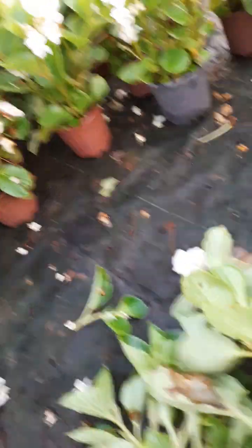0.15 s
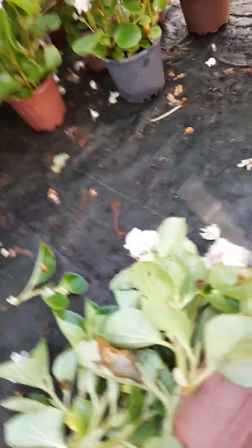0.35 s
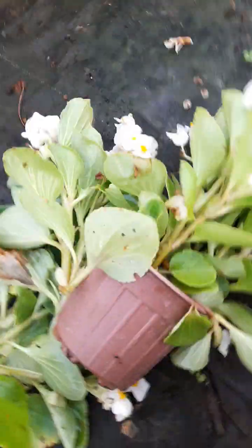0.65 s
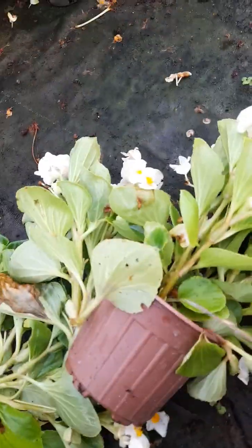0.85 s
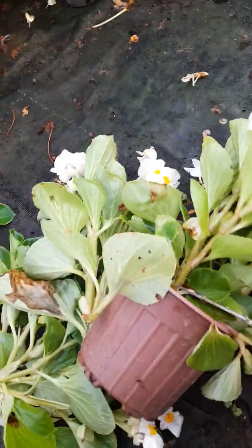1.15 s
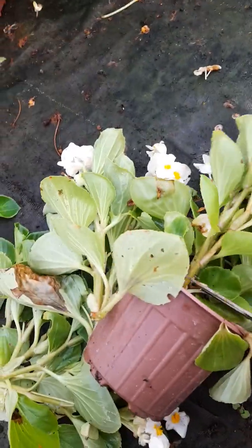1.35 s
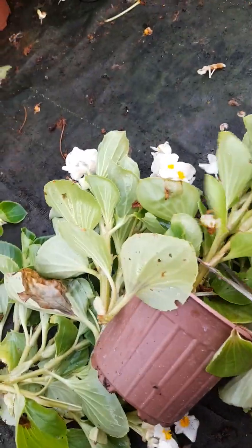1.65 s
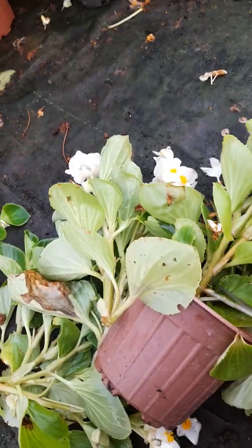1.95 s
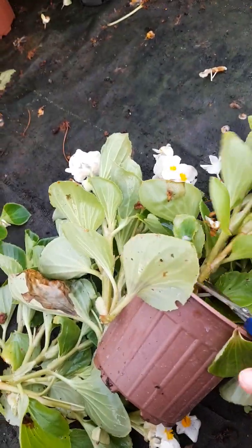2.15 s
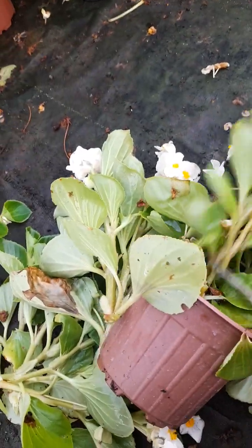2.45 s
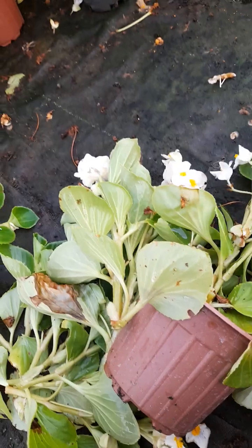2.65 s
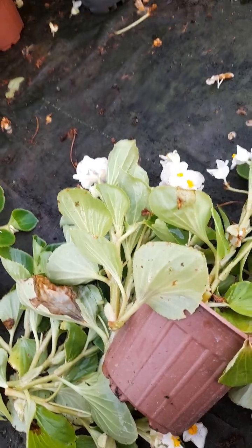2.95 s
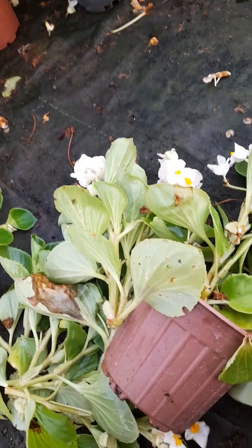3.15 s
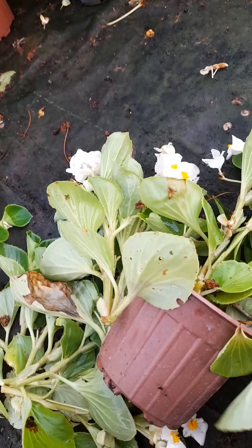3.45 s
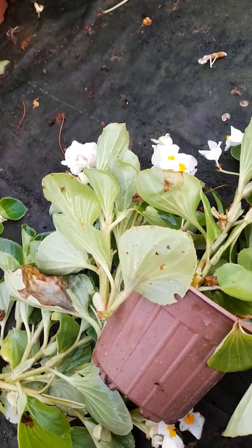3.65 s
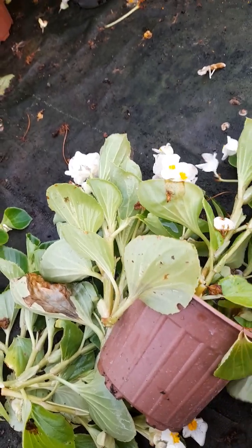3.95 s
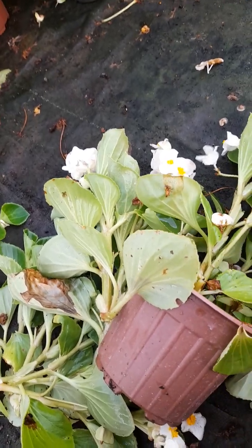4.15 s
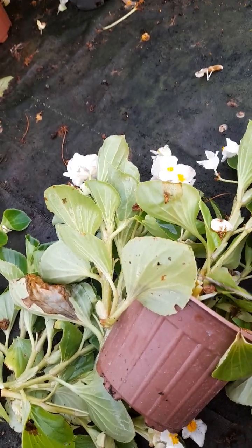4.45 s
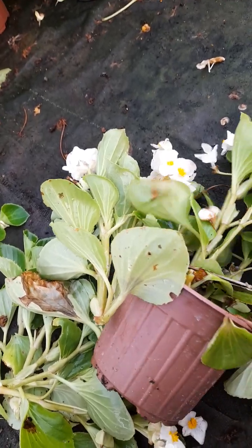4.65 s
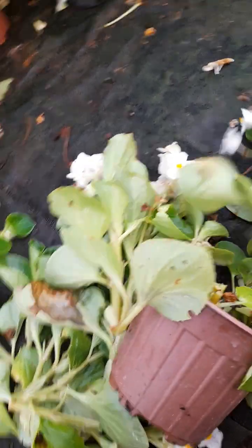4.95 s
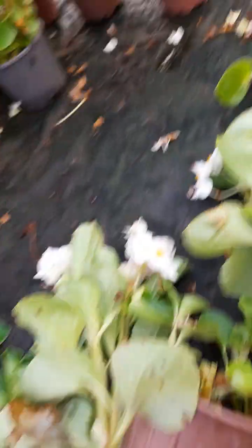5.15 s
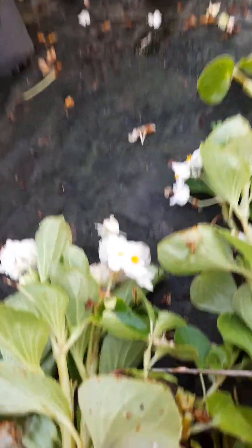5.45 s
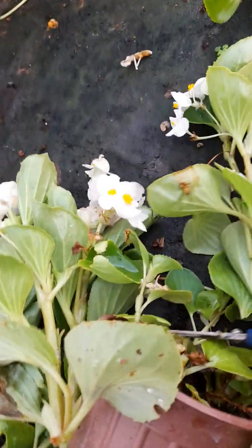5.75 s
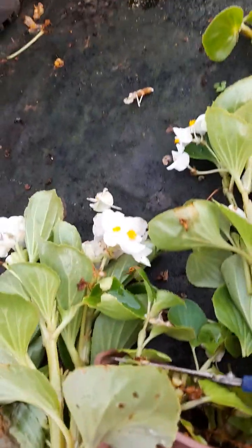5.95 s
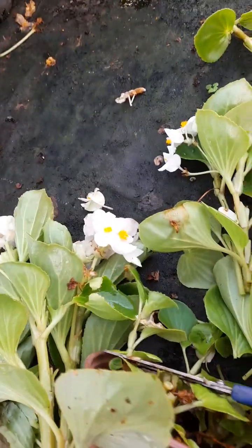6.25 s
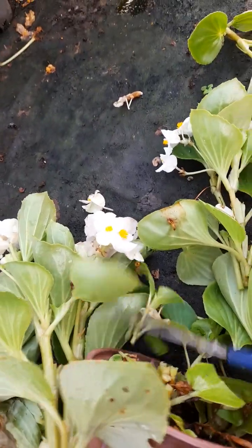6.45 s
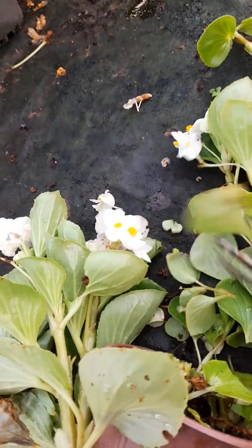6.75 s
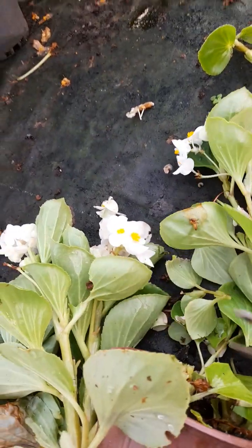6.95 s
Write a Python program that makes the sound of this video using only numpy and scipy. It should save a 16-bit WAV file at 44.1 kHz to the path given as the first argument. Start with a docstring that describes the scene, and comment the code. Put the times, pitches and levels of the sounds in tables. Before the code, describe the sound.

Leaves rustle and crack close by as snips sharply cut through stems four times, with distant fans rumbling faintly.

```python
"""Snipping stems in a greenhouse

Hand snips cut the fleshy stems of potted plants close to a hand-held phone. Each cut snaps sharply,
jolts the hand and flutters between ground and roof. Leaves rustle by friction and crack as they give way.
A low rumble of distant fans and a faint hiss lie underneath."""
import sys
import numpy as np
from scipy import signal
from scipy.fft import rfft, irfft, next_fast_len
from scipy.io import wavfile
from scipy.ndimage import uniform_filter1d, map_coordinates

SR = 44100
rng = np.random.default_rng(int(sys.argv[2]) if len(sys.argv) > 2 else 0)


def pcm_store(signal):
    """Save signal as 16-bit PCM."""
    levels = np.round(np.clip(np.atleast_2d(signal), -1, 1) * 32767)
    wavfile.write(sys.argv[1], SR, levels.astype(np.int16).T)


N = 313551


def amp(db):
    """Amplitude ratio of a level in dB."""
    return 10 ** (np.asarray(db) / 20)


def unit(x):
    """Normalisation to rms 1."""
    return x / np.sqrt(np.mean(x ** 2) + 1e-20)


def along(points, hz):
    """Interpolation on a logarithmic frequency axis."""
    f, v = np.transpose(points)
    return np.interp(np.log(hz + 1), np.log(f + 1), v)


def wobble(rate):
    """Smooth random modulation, rate knots a second."""
    knots = rng.standard_normal(int(N * rate / SR) + 4)
    return map_coordinates(knots, [np.arange(N) * rate / SR])


def filtered(x, response):
    """Linear filtering by a complex frequency response."""
    m = next_fast_len(x.shape[-1] + 8192)
    return irfft(rfft(x, m) * response(np.fft.rfftfreq(m, 1 / SR)), m)[..., :x.shape[-1]]


def coloured(x, spectrum):
    """Spectral shaping, at rms 1."""
    return unit(filtered(x, lambda hz: amp(along(spectrum, hz))))


def stereo_noise(correlation):
    """Partly coherent white noise, mixed from mid and side."""
    turn = np.arccos(correlation) / 2
    mid, side = rng.standard_normal((2, N)) * [[np.cos(turn)], [np.sin(turn)]]
    return np.array([mid + side, mid - side])


def panned(db):
    """Two gains for a pan, the level of left over right."""
    return amp(np.multiply.outer([.5, -.5], db))


# Each row: time in seconds, rumble level in dB.
FAN_LEVELS = [(0.0, -48), (0.16, -51.5), (0.73, -54.5), (1.05, -49.5), (1.58, -62.5), (2.59, -53.5),
              (2.71, -55.5), (2.91, -58), (3.15, -62), (3.46, -56), (3.9, -52), (4.36, -56), (4.83, -57),
              (5.17, -55.5), (5.96, -56), (6.3, -60.5), (6.65, -55.5), (7.11, -56.5)]
# Each row: frequency in Hz, relative spectral density in dB.
FAN_SPECTRUM = [(13, -62.5), (22, -35), (42, -8), (64, 2), (102, -5), (199, -20.5), (269, -21.5),
                (381, -28), (700, -39), (910, -63.5), (1540, -120)]
HISS_SPECTRUM = [(240, -38), (400, -11), (497, -10), (580, -7.5), (1470, -17.5), (2960, -14.5), (3150, -32),
                 (3510, -24), (6230, -16), (8760, -19), (13500, -12.5), (16300, -24)]

def background():
    """Coherence: far fans reach both microphones nearly alike, while the hiss is uncorrelated."""
    fan_db = np.interp(np.arange(N) / SR, *np.transpose(FAN_LEVELS))
    fans = amp(fan_db + 3.3 * wobble(7.5)) * coloured(stereo_noise(0.81), FAN_SPECTRUM)
    hiss = amp(-74 + 0.97 * wobble(15)) * coloured(stereo_noise(0.023), HISS_SPECTRUM)
    return fans + hiss


def contacts(rate, spread_db, life_s):
    """Shot noise: an envelope of tiny contacts that start at once and decay, a few much stronger."""
    starts = (rng.random(N) < rate / SR) * amp(spread_db * rng.exponential(size=N))
    fall = np.exp(-1 / (life_s * SR))
    return unit(signal.lfilter([1], [1, -fall], starts))


def pops(rate, spread_db, cycles):
    """Buckling: leaves pop in damped tones, each with its own pitch and place."""
    when, pitch, strength, place = rng.random((round(rate * N / SR), 4)).T[:, :, None]
    t = np.arange(400) / SR
    hz = 950 * 2.8 ** pitch
    tones = amp(-spread_db * np.log(strength)) * np.sin(2 * np.pi * hz * t) * np.exp(-hz * t / cycles)
    at = ((when * N).astype(int) + np.arange(len(t))).ravel()
    sides = panned(12 * (place - .5))
    return unit(np.array([np.bincount(at, (tones * side).ravel(), N)[:N] for side in sides]))


def patchy(x, depth_db=2.5):
    """Random modulation in patches of time and frequency."""
    z = signal.stft(x, nperseg=256)[2]
    field = uniform_filter1d(rng.standard_normal(z.shape[1:]), size=4, axis=0)
    field = uniform_filter1d(field, size=8, axis=1)
    return signal.istft(z * amp(depth_db * unit(field)), nperseg=256)[1][:, :N]


# Hand and blades brush the leaves. Each row: start and length in seconds, then drag level,
# edge level, swell and pan in dB.
LEAF_STROKES = [(0, 0.064, -42, -48, 0.5, -1.5), (0.078, 0.15, -44.5, -46.5, -7.5, -3),
                (0.205, 0.12, -38.5, -44.5, -5.5, -4), (0.326, 0.11, -48.5, -53.5, -10, -4),
                (0.426, 0.14, -55.5, -57, -4, -3), (0.547, 0.15, -63, -65.5, -12.5, -2),
                (.7, .22, -79, -76.5, 4, -8.5), (0.919, 0.12, -79.5, -74, 15.5, -4),
                (1.044, 0.21, -57.5, -61, -5.5, -2), (1.474, 0.15, -75.5, -70, 9.5, -0.5),
                (1.628, .11, -71.5, -62, -2.5, 0), (1.792, 0.093, -74, -68, 6, -1),
                (1.927, 0.37, -89.5, -86, 17, -4), (2.223, .16, -71.5, -66, 18.5, 0.5),
                (2.386, .17, -49, -45.5, -6, 0), (2.558, 0.14, -52, -59, -5, 0.5),
                (2.697, 0.12, -60, -67.5, -2.5, 0), (2.847, 0.17, -63, -68, 0.5, -0.5),
                (3.037, 0.16, -72, -76, -10, -5), (3.201, 0.1, -70, -73, -6, -5),
                (3.333, 0.16, -71, -69.5, -1.5, -1.5), (3.551, 0.21, -52.5, -51, -0.5, -3.5),
                (3.763, 0.21, -49.5, -50, -7.5, -2.5), (3.864, 0.14, -45, -46.5, -3, 0),
                (4.032, 0.11, -59.5, -63.5, -2.5, -0.5), (4.148, 0.27, -63, -70, -8.5, -2),
                (4.347, 0.27, -63, -64.5, -12, 0), (4.619, 0.097, -68.5, -58, 10.5, 1),
                (4.71, 0.11, -56, -50.5, 2, -3), (4.821, 0.11, -47.5, -43, -13.5, -2),
                (4.936, 0.143, -60, -57.5, 10.5, 0.5), (5.092, 0.048, -47, -55, -6, -2),
                (5.163, 0.075, -67.5, -68.5, 8, -1.5), (5.249, 0.51, -57.5, -59, -16, -5),
                (5.692, 0.097, -63.5, -63, 1, -2), (5.793, .27, -61, -63.5, -6, -2.5),
                (6.209, 0.075, -64.5, -65, -7, -2), (6.354, 0.12, -69, -70, 21.5, -2),
                (6.46, 0.1, -52.5, -56, -11, -3), (6.557, 0.067, -50.5, -56.5, 5, 0),
                (6.593, 0.25, -45.5, -49, -24.5, -1), (6.84, 0.34, -74, -70.5, -4, -5)]

def strokes():
    """Incoherent sources add in power: drag and edge envelopes of strokes over settling leaves."""
    attack_s, release_db_per_s, settling_db = 0.0086, 349, [-86, -80.5]
    t = np.arange(N) / SR
    power = np.ones((2, 2, N)) * amp(settling_db)[:, None, None] ** 2
    for start, length, drag_db, edge_db, swell_db, pan_db in LEAF_STROKES:
        at = slice(round(start * SR), round((start + length + .2) * SR))
        age = t[at] - start
        swell = swell_db * np.clip(age / length, 0, 1)
        release = amp(-release_db_per_s * np.clip(age - length, 0, None))
        shape = np.clip(age / attack_s, 0, 1) * release * panned(pan_db)[:, None]
        power[0, :, at] += (shape * amp(drag_db + swell)) ** 2
        power[1, :, at] += (shape * amp(edge_db + 0.83 * swell)) ** 2
    return np.sqrt(power)


# Broad leaves rubbing, and leaf edges. Each row: frequency in Hz, relative spectral density in dB.
DRAG_SPECTRUM = [(120, -31.5), (200, -3), (222, -16), (320, -2), (381, -11.5), (444, -7.5), (548, -14),
                 (624, -13.5), (877, -4), (1560, -13.5), (1840, -2.5), (3300, -10), (4290, -17),
                 (7260, -120)]
EDGE_SPECTRUM = [(1760, -25), (3000, -8.5), (4810, 0.5), (5200, -2.5), (5820, -1), (7610, -3), (8230, -10),
                 (8890, -6), (10200, -5), (12200, -1.5), (13400, 0), (15100, -0.5), (16200, -37)]

def rustle():
    """Stick-slip friction: leaves drag in soft slips, with pops below and fine ticks above."""
    drag_gain, edge_gain = strokes()
    slips = unit(1.2 + contacts(rate=150, spread_db=1.5, life_s=.006))
    ticks = unit(0.4 + contacts(rate=1300, spread_db=2.5, life_s=0.0012))
    drag = coloured(patchy(slips * stereo_noise(.2)), DRAG_SPECTRUM)
    drag += amp(-7) * pops(rate=220, spread_db=2.2, cycles=2.6)
    edges = coloured(patchy(unit(slips + ticks) * stereo_noise(0.059)), EDGE_SPECTRUM)
    return drag_gain * drag + edge_gain * edges


# Each row: start in seconds, relative pop and tick levels in dB, pop pitch in Hz, crunch T60 in seconds.
STEM_CRACKS = [(.075, -50, -37, 2000, .03), (.097, -50, -38, 2000, .03), (.11, -41, -27, 2080, 0.091),
               (.223, -27, -28, 2140, 0.11), (.231, -22, -23, 2500, 0.095), (.264, -28, -31, 1170, 0.044),
               (.3, -36, -50, 1300, 0.043), (.347, -42, -40, 1850, 0.039), (.433, -35.5, -35.5, 1980, 0.05),
               (.471, -32.5, -60, 1980, 0.039), (.509, -52, -40.5, 2120, 0.073),
               (.998, -65, -52, 2000, .02), (1.021, -65, -51, 2000, .02), (1.057, -37, -37.5, 830, 0.027),
               (1.072, -42, -39, 2670, 0.026), (1.124, -47, -45, 2030, .03), (1.213, -48, -50, 2330, .03),
               (1.268, -51, -48, 2510, .03), (1.382, -67, -73, 2400, 0.018), (1.457, -55, -63, 920, .05),
               (1.642, -51, -41.5, 2270, 0.064), (1.804, -64, -52.5, 2470, 0.093),
               (2.022, -67, -59, 2000, 0.018), (2.322, -41, -36, 2540, 0.25),
               (2.346, -28, -32.5, 2200, 0.024), (2.516, -34, -41, 2660, 0.12),
               (2.619, -38.5, -68, 1090, 0.022), (2.672, -43, -39, 1740, 0.063),
               (2.775, -42.5, -67, 1730, 0.022), (2.807, -41, -76, 1120, 0.032),
               (2.859, -42.5, -55, 1900, 0.029), (2.926, -41, -51, 2130, 0.047),
               (2.98, -52, -45.5, 990, 0.098), (3.213, -52.5, -53.5, 1830, .045),
               (3.485, -64.5, -64, 1980, 0.023), (3.526, -59, -55, 2560, 0.089),
               (3.567, -43.5, -36, 846, 0.14), (3.592, -40, -36, 1710, 0.051),
               (3.608, -36, -39, 1450, 0.068), (3.637, -54, -38.5, 2470, 0.043),
               (3.67, -34.5, -28, 1950, 0.11), (3.705, -36, -30.5, 2460, 0.055),
               (3.712, -25.5, -25, 2140, 0.091), (3.867, -52, -32.5, 850, 0.029),
               (3.989, -42, -59, 1810, 0.24), (4.105, -55, -50, 1980, 0.068), (4.25, -51.5, -68, 2310, .04),
               (4.357, -36.5, -47.5, 765, 0.13), (4.44, -55, -54.5, 1950, 0.23),
               (4.478, -46, -67, 2220, 0.093), (4.516, -46, -59, 940, 0.1),
               (4.605, -67.5, -52.5, 1560, 0.064), (4.635, -61, -48, 990, .05),
               (4.657, -44.5, -34.5, 2740, 0.17), (4.696, -42, -39, 2200, 0.2),
               (4.725, -32, -33, 1630, 0.14), (4.752, -39.5, -30.5, 2300, 0.028),
               (4.895, -37, -43, 940, 0.063), (5.088, -38, -52, 1730, 0.066),
               (5.258, -36, -61, 2290, 0.014), (5.498, -41, -53, 2190, .065),
               (5.768, -47.5, -43.5, 2530, 0.12), (5.785, -41, -41.5, 2330, 0.071),
               (6.196, -64, -48.5, 1800, 0.037), (6.237, -57.5, -53, 1020, 0.049),
               (6.324, -49, -57.5, 1784, 0.07), (6.553, -33.5, -35.5, 1050, .06),
               (6.601, -29.5, -54, 2340, 0.089), (6.677, -41, -60, 2230, 0.08),
               (6.706, -43, -64, 960, .045), (6.847, -45, -60, 2400, 0.036)]
# Blades crush a stem before it parts. Each row: start and end in seconds, final body and treble in dB.
BLADE_BITES = [(2.371, 2.380, -35, -38), (3.729, 3.752, -31, -31), (4.800, 4.812, -36, -32),
               (6.449, 6.464, -36, -37)]

def cracks():
    """Fracture: stems and leaves give way with a pop, a tick and a crunch; crushed fibres yield in fits."""
    tone, low, high = np.zeros((3, 2, N + SR))
    t = np.arange(SR // 5) / SR
    rise = 1 - np.exp(-t / .0007)
    tick = 1.9 * amp(-60 * t / .007)
    pans_db = -1 + rng.standard_normal(len(STEM_CRACKS))  # the plant lies to the right
    for (start, pop_db, tick_db, hz, t60), pan_db in zip(STEM_CRACKS, pans_db):
        side = panned(pan_db)[:, None]
        at = slice(round(start * SR), round(start * SR) + len(t))
        crunch = rise * amp(-60 * t / t60)
        tone[:, at] += side * rise * amp(pop_db - 4 - 60 * t / 0.025) * np.sin(2 * np.pi * hz * t)
        low[:, at] += side * amp(pop_db - 9) * crunch
        high[:, at] += side * amp(tick_db - 8) * (tick + crunch)
    for start, end, body_db, treble_db in BLADE_BITES:
        at = slice(round(start * SR), round(end * SR))
        closing_db = np.linspace(-5, 0, at.stop - at.start)
        fits = amp(2.5 * wobble(300)[at] + closing_db)
        low[:, at] += amp(body_db) * fits
        high[:, at] += amp(treble_db) * fits
    body = low[:, :N] * coloured(stereo_noise(0.056), DRAG_SPECTRUM)
    treble = high[:, :N] * coloured(stereo_noise(0.074), EDGE_SPECTRUM)
    return tone[:, :N] + body + treble


# Each row: frequency in Hz, reverberation time in seconds.
TAIL_T60 = [(300, .4), (2000, 0.66), (7000, 0.76), (14000, 0.58)]
# Each row: delay in seconds, click level in dB, smear level in dB.
ROOF_ECHOES = [(0.0152, -18.5, -15), (0.034, -29, -24.5), (.051, -37.5, -23.5), (0.069, -53, -31.5)]

def greenhouse(size):
    """Flutter echo: clicks return between ground and roof, smeared by glazing bars, over a diffuse tail."""
    hz, t, z = signal.stft(rng.standard_normal((2, size)), SR, nperseg=128)
    tail = signal.istft(z * amp(-60 * t / along(TAIL_T60, hz)[:, None]), SR, nperseg=128)[1][:, :size]
    response = amp(-19) * tail / np.linalg.norm(tail[0])
    t = np.arange(size) / SR
    for delay, click_db, smear_db in ROOF_ECHOES:
        age = np.clip(t - delay, 0, None)
        smear = (t > delay) * amp(-60 * age / .03) * rng.standard_normal((2, size))
        response += amp(smear_db) * smear / np.linalg.norm(smear[0])
        response[:, round(delay * SR)] += amp(click_db)
    return response


# Each row: resonance in Hz, bandwidth in Hz, relative level in dB.
SNIP_RESONANCES = [(2470, 420, 4.5), (4530, 320, -3), (6590, 980, 1.5), (8040, 520, -0.5), (9000, 700, -5),
                   (11150, 1600, 1), (14960, 2700, -7)]

def snip_colour(hz, tilt_db):
    """Resonance: broad peaks colour each snip, with a ring near 2.5 kHz; thick stems favour low ones."""
    response = 0
    for k, (centre, width, db) in enumerate(SNIP_RESONANCES):
        gain = (-1) ** k * amp(db - tilt_db * np.log2(centre / 6000))
        response += gain * 1j * hz * width / (centre ** 2 - hz ** 2 + 1j * hz * width)
    return response


# Each row: frequency in Hz, phase difference in radians.
PORT_PHASES = [(500, .2), (2600, 0.48), (4500, 0.96), (7000, 2), (11000, 1.7), (16000, 1.7)]

def ports(hz):
    """Diffraction: the phone's body turns the phase between its two microphone ports."""
    return np.exp(np.multiply.outer([.5j, -.5j], along(PORT_PHASES, hz)))


# Each row: start in seconds, then relative level, pan, jolt and knock in dB, burst T60 in seconds,
# bass tilt from stem thickness in dB per octave.
CUTS = [(2.3803, -1, -1.5, -16, -37.5, 0.0024, -4), (3.7518, -4, 1.5, -40, -40, 0.0066, -1.5),
        (4.8124, -0.5, -4, -20.5, -35, 0.0075, -3.5), (6.4647, -7, 0.5, -22, -24.5, 0.013, -1)]

def snips():
    """Impulse excitation: a stem parts with a sharp snap that jolts the phone and knocks the pot."""
    out = np.zeros((2, N + SR))
    t = np.arange(SR // 2) / SR
    for start, db, pan_db, jolt_db, knock_db, t60, tilt_db in CUTS:
        noise = rng.standard_normal((3, len(t)))
        burst = (noise[0] + .6 * noise[1:]) * (amp(-60 * t / t60) + amp(-15 - 60 * t / .03))
        burst[:, 20] += 8  # the fibres let go at once
        snap = filtered(burst, lambda hz: snip_colour(hz, tilt_db) * ports(hz))
        snap = panned(pan_db)[:, None] * snap / np.abs(snap).max()
        echo = signal.fftconvolve(snap, greenhouse(len(t)), axes=1)[:, :len(t)]
        thud = np.sin(2 * np.pi * 62 * t) + 0.49 * np.sin(2 * np.pi * 115 * t)
        rise = 1 - np.exp(-t / 0.0038)
        jolt = amp(jolt_db - 60 * t / 0.081) * rise * thud * amp([[0], [-14]])  # mostly at the left port
        knock = amp(knock_db - 60 * t / 0.039) * np.sin(2 * np.pi * 290 * t)
        out[:, round(start * SR):][:, :len(t)] += amp(db + 3) * (snap + echo + jolt + knock)
    return out[:, :N]


def scene():
    """Superposition of cuts, leaves and background."""
    return snips() + cracks() + rustle() + background()


def record(dry):
    """Saturation and band limiting: loud snaps are rounded; deep bass and top treble are filtered out."""
    bass_hz, top_hz = 45, 16900
    saturated = dry / (1 + np.abs(dry) ** 6) ** (1 / 6)
    highpass = lambda hz: (1j * hz / (1j * hz + bass_hz)) ** 2
    lowpass = lambda hz: np.sin(np.pi / 2 * np.clip((top_hz - hz) / 600, 0, 1)) ** 2
    return filtered(saturated, lambda hz: highpass(hz) * lowpass(hz))


dry = scene()
out = record(dry)
pcm_store(out)
```